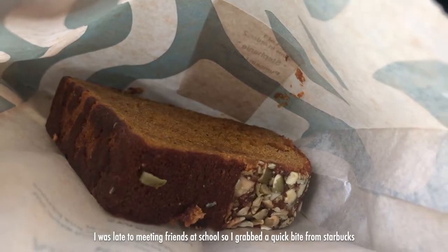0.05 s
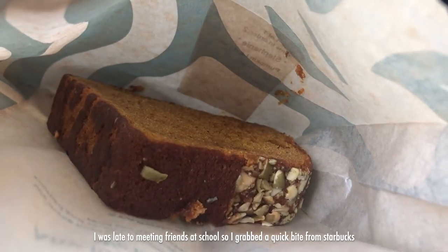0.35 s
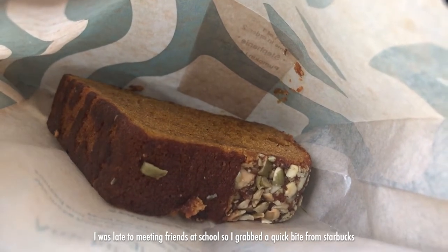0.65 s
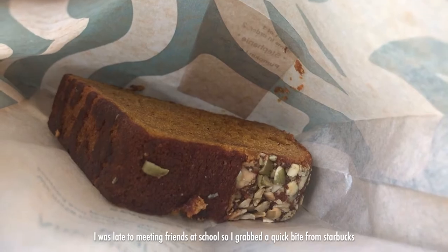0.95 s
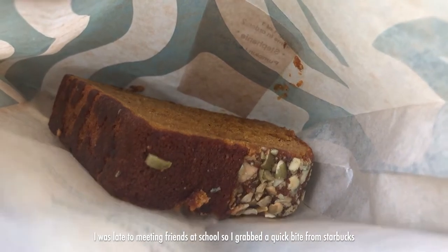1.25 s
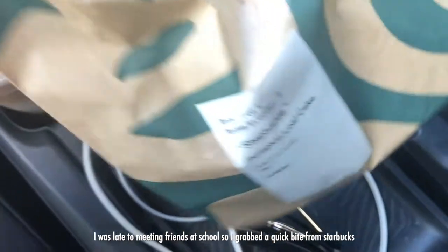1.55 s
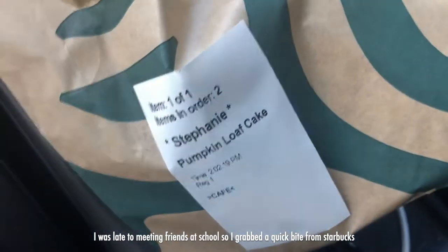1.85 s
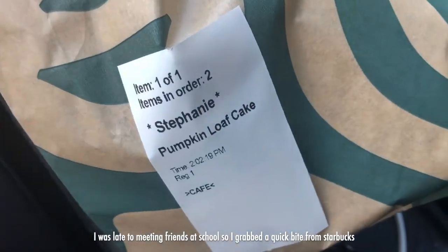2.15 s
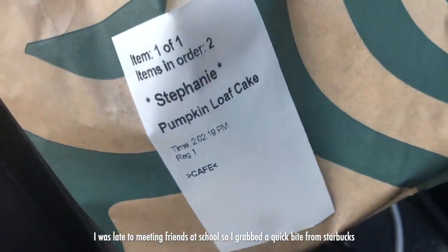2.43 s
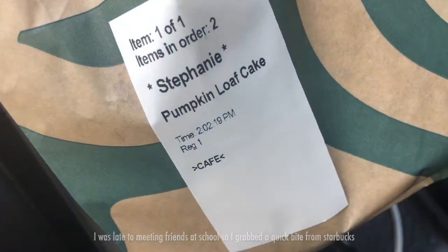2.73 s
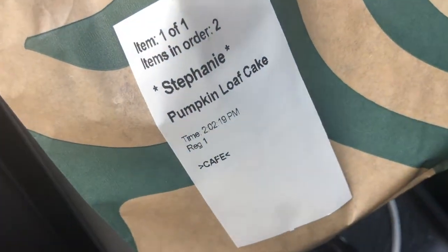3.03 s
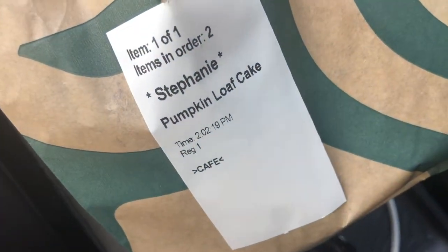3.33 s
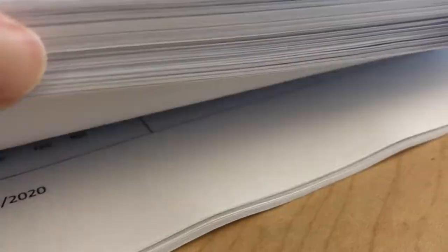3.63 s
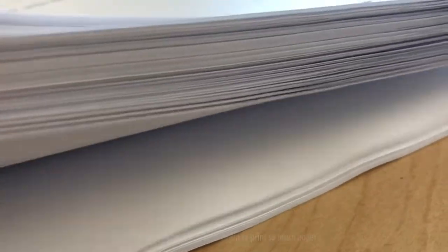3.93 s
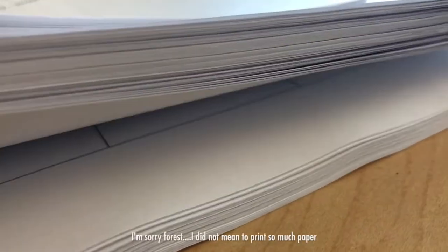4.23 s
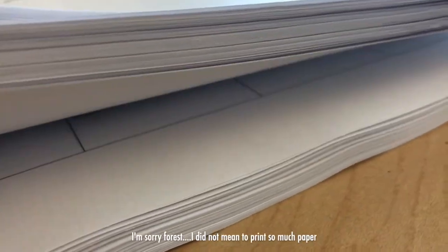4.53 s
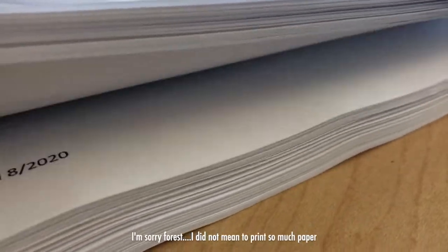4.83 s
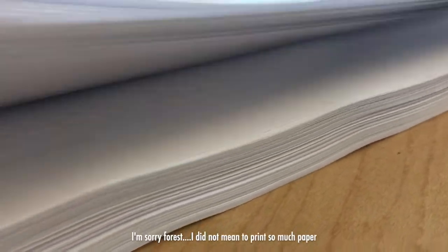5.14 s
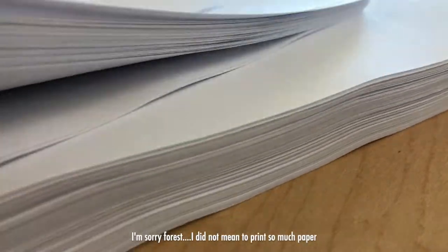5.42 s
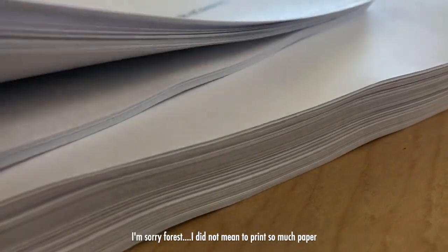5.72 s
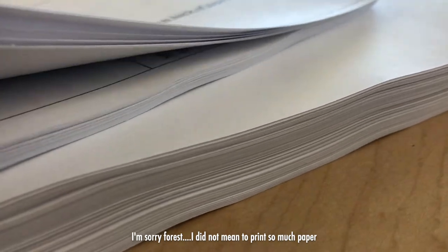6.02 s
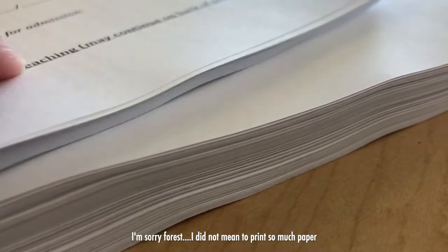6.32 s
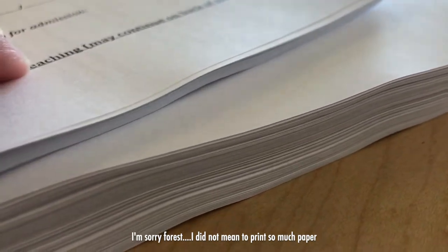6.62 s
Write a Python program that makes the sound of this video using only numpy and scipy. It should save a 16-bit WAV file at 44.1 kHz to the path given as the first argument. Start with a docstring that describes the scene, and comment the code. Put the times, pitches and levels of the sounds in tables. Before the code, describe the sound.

Over the low hum of a parked car, a nearby paper bag rubs and crinkles briefly, then settles with scattered ticks as the rumble eases. The car gives way to the low tone of a quiet room. There, close up, sheets slip off a thumb in an irregular run, scraping, flicking free and patting down on the pile, with soft wafts of air and a faint, intermittent hiss.

```python
"""A paper bag is handled in a parked, idling car: its walls rub and its creases snap.
Around 1.3 s, at the height of the crackle, the microphone lifts off the bag; the rumble drops and
the paper settles. From 3.55 s, in a quiet room, a thumb lets the pages of a thick stack go one by one:
each sheet scrapes past its neighbour and snaps free, and many slap down on the pile,
among soft wafts of air and a faint hiss that comes and goes."""
import sys
import numpy as np
from scipy import signal
from scipy.fft import rfft, irfft
from scipy.io import wavfile

SR = 44100
rng = np.random.default_rng(int(sys.argv[2]) if len(sys.argv) > 2 else 0)


def wrap_up_sound(samples):
    """Save the sound to the file named by the first command line argument, as 16-bit audio."""
    columns = np.atleast_2d(samples).T
    # keep every value between -1 and 1, then stretch to whole-number steps
    tamed = np.clip(columns, -1, 1)
    steps = np.round(tamed * 32767).astype(np.int16)
    wavfile.write(sys.argv[1], SR, steps)


N = 298557
TIME = np.arange(N) / SR
HIT_SIZE, HIT_WINDOW_S = 4096, .005  # samples in one hit; the span over which its level counts
HIT_T, HIT_HZ = np.arange(HIT_SIZE) / SR, np.fft.rfftfreq(HIT_SIZE, 1 / SR)
LIFT_S, ROOM_S = 1.32, 3.55  # the microphone leaves the bag; the room begins
GAP_WIDTH_HZ, EDGE_WIDTH_HZ = 1260, 3000  # widths of the pages' two moving resonances

# Creases buckling. Each row: time in seconds, burst length in seconds, level in dB, brightness in dB.
CREASES = [(0.051, 0.0015, -65.5, 0), (0.6592, 0.0024, -54, -2), (0.9935, .001, -68.5, 4.5),
           (1.149, 0.0011, -49.5, -6.5), (1.164, 0.0034, -35, -1.5), (1.2294, 0.0063, -43.5, -6.5),
           (1.2337, 0.0014, -40, -2.5), (1.238, 0.0016, -41, -4.5), (1.2666, 0.0014, -44.5, -9.5),
           (1.2707, .005, -39, -4), (1.276, 0.00045, -27.5, 8), (1.2973, 0.0022, -39, -2),
           (1.311, .0033, -38, -3), (1.319, .0034, -38, 1), (1.3216, .0014, -37, 7.5),
           (1.325, .0015, -40, 4.5), (1.334, 0.0036, -30.5, 2.5), (1.3489, 0.0045, -38.5, -1.5),
           (1.3699, 0.0006, -40.5, 9), (1.3732, 0.0013, -32, 0), (1.392, 0.0016, -44, 6),
           (1.4048, .0017, -33.5, 0.5), (1.425, 0.00078, -46.5, -4), (1.441, 0.0016, -35, 3),
           (1.4859, 0.001, -55.5, -11), (1.498, 0.0012, -57.5, -7), (1.59, .0047, -59.5, 0.5),
           (1.6357, .0024, -68, -3), (1.7039, 0.0015, -49, 1.5), (1.753, .0013, -65.5, -7),
           (1.847, .00075, -41.5, 11.5), (1.8757, 0.00081, -58.5, -8), (1.9187, 0.0014, -64, -10.5),
           (2.026, 0.0021, -54, -1.5), (2.052, .0019, -64, 3.5), (2.2275, 0.0028, -54.5, -3.5),
           (2.4426, .0011, -68, -1.5), (2.5091, 0.00086, -56.5, 6.5), (2.5898, 0.0017, -66.5, -9),
           (2.6519, 0.001, -64.5, 0.5), (2.672, 0.0011, -78.5, -8.5), (2.9418, 0.00087, -33.5, -1.5),
           (3.2203, .0035, -76.5, -28), (3.2563, .0026, -64.5, -18.5)]
# How taut the bag is held. Each row: time in seconds, pitch of its panels in Hz.
TAUTNESS = [(0, 1600), (1.23, 1604), (1.37, 1950), (1.6, 1640), (2.55, 1840), (2.94, 1360), (3.25, 1200)]
# The bag's walls rubbing. Each row: start in seconds, end in seconds, relative level in dB.
BAG_RUBS = [(.595, .62, -70), (1.06, 1.086, -62.5), (1.1, 1.171, -47.5), (1.187, 1.485, -55.5),
            (1.249, 1.436, -49.5), (1.29, 1.347, -42), (2.15, 2.164, -66), (2.323, 2.34, -66.5),
            (2.83, 2.86, -75), (3.12, 3.151, -76.5)]
# Sheets slipping off the thumb. Each row: release time in seconds, scrape length in seconds,
# then the levels of scrape, snap and flap in dB.
FLICKS = [(3.5976, 0.0018, -61, -38, -28.5), (3.6203, .0016, -58.5, -54.5, -49.5),
          (3.8671, 0.0047, -55.5, -57.5, -43), (3.957, .003, -64.5, -60.5, -62.5),
          (3.968, .004, -73, -49.5, -45), (3.985, 0.0053, -66, -55, -49), (3.9935, 0.0043, -55, -39, -36.5),
          (4.0536, 0.011, -57, -35.5, -35), (4.1473, 0.0086, -52, -43, -35),
          (4.156, 0.0036, -36.5, -30, -31.5), (4.27, .003, -70, -68, -68), (4.408, 0.0093, -44, -33, -33),
          (4.433, .001, -58, -41.5, -38.5), (4.616, 0.01, -57, -46.5, -51), (4.6331, 0.008, -47, -43, -48),
          (4.6847, 0.011, -54.5, -54, -58), (4.706, 0.015, -52.5, -57, -41.5),
          (4.7301, .0087, -58, -52, -46), (4.76, 0.01, -44.5, -44, -34), (4.9203, 0.0096, -45, -56, -45),
          (4.9315, 0.009, -46.5, -40, -31.5), (5.117, 0.0067, -50.5, -69, -49.5),
          (5.1491, 0.017, -47.5, -40.5, -32.5), (5.1686, 0.0097, -49.5, -42, -37),
          (5.254, .0035, -48, -37.5, -40.5), (5.28, 0.0085, -48.5, -42, -49),
          (5.2951, 0.0063, -35.5, -30.5, -31), (5.3463, .0055, -46, -30.5, -37.5),
          (5.3591, .0016, -59, -44, -42), (5.447, 0.0031, -44, -42, -50), (5.458, 0.0036, -42.5, -43, -51),
          (5.4776, 0.005, -38.5, -43.5, -46.5), (5.4978, 0.011, -49.5, -56, -46),
          (5.5093, .004, -62, -41.5, -50), (5.5218, 0.0057, -41, -48, -57),
          (5.6241, 0.012, -43, -36.5, -37.5), (5.7948, 0.017, -50.5, -43.5, -51),
          (5.9348, 0.0088, -43.5, -44, -44.5), (6.1497, 0.016, -44, -38.5, -37),
          (6.2046, 0.014, -54.5, -49.5, -72), (6.227, 0.014, -49, -40, -45),
          (6.2624, 0.015, -41.5, -39, -49), (6.269, 0.011, -45, -60, -43)]
# The wedge of air between open pages. Each row: time in seconds, resonance in Hz, ringing share 0-1.
AIR_GAP = [(3.55, 1680, 0.56), (5.15, 1700, 0.07), (5.6, 2135, 0.95), (5.8, 2070, 0.98), (6.15, 2280, 0.28),
           (6.77, 2600, 0.06)]
# The free edge singing under the thumb. Each row: time in seconds, resonance in Hz, ringing share 0-1.
SINGING_EDGE = [(4.41, 5000, 0.46), (4.6, 9000, 0), (5.15, 7100, 0.1), (5.28, 14100, 0.44),
                (5.45, 14400, 0.25), (5.8, 14500, 0.03), (6.2, 6030, 0.08), (6.27, 8000, 0.36)]
# Sheets landing. Each row: time in seconds, contact in seconds, pitch of trapped air in Hz, level in dB.
SLAPS = [(3.6205, 0.0028, 824, -39), (4.0153, .0015, 520, -44.5), (4.0739, 0.00094, 615, -36),
         (4.1596, 0.0028, 750, -31.5), (4.1704, 0.00014, 1070, -18.5), (4.179, .0031, 926, -49),
         (4.4237, .00033, 820, -19.5), (4.6517, 0.0028, 415, -40.5), (4.7147, 0.0024, 930, -41.5),
         (4.7625, 0.0019, 1050, -45), (4.7746, 0.0033, 450, -40), (4.947, 0.00023, 340, -29),
         (5.167, 0.0028, 1040, -34), (5.185, 0.0011, 435, -41), (5.3061, .0017, 463, -33.5),
         (5.348, .0016, 970, -43), (5.3832, 0.002, 1520, -38.5), (5.3871, 0.0023, 1290, -33),
         (5.5454, 0.0027, 905, -47), (5.643, 0.0024, 786, -34.5), (5.8214, 0.0013, 940, -44.5),
         (5.954, 0.00083, 578, -42.5), (6.1664, 0.0032, 664, -42), (6.2813, 0.0032, 880, -49.5)]
# Resonances of the pile and the desk. Each row: centre in Hz, width in Hz, boost in dB.
STACK_MODES = [(570, 300, 0), (1700, 280, 6.5), (2600, 400, 6)]
# Sheets creeping as the stack bends. Each row: start and end in seconds, relative end level in dB.
SLIDES = [(3.99, 4.112, -60.5), (4.293, 4.405, -56.5), (4.526, 4.622, -51), (4.647, 4.76, -57),
          (4.953, 5.013, -70), (5.17, 5.35, -55.5), (5.434, 5.608, -49.5), (5.737, 5.793, -53.5),
          (6.091, 6.27, -53)]
# Air wafted by moving paper. Each row: time of the peak in seconds, half-width in seconds, level in dB.
PUFFS = [(1.249, 0.0053, -43.5), (1.389, 0.0098, -55), (4.186, .011, -46.5), (4.65, 0.0098, -48),
         (4.773, 0.013, -45), (4.947, 0.0087, -37), (4.987, 0.0047, -42), (5.015, 0.0037, -42.5),
         (5.304, 0.014, -39), (5.348, 0.0071, -39), (5.379, .016, -39), (5.642, 0.012, -44),
         (6.17, .01, -42.5)]
# Stretches of faint hiss. Each row: start in seconds, end in seconds.
HISSES = [(4.14, 4.22), (4.42, 4.815), (4.89, 5.02), (6.19, 6.495), (6.62, 6.8)]
# The idling engine's tones. Each row: pitch in Hz, level at the bag in dB.
ENGINE_HUM = [(177.6, -59), (258.4, -70), (355.3, -67.5), (920.5, -79.5)]
# The EQ curve of a slap. Each row: multiple of its pitch, gain in dB.
SLAP_COLOUR = [(.1, -10), (.3, -10.5), (.65, 3), (1, -3.5), (1.9, -9.5), (3, -20.5), (4.5, -29), (12, -41)]
# EQ curves of the other layers. Each row: frequency in Hz, relative gain in dB.
RUB_COLOUR = [(120, -8.5), (300, 1), (700, 6), (1100, 5.5), (1700, 1.5), (3000, -1.5), (6000, 0),
              (10000, -4), (16000, -6.5)]  # bag wall on bag wall
FACE_COLOUR = [(200, 6), (500, 0.5), (900, 5), (1500, 0), (2600, 5), (3600, -4), (5000, -6.5), (12000, -57)]  # sheet on sheet
SCRAPE_COLOUR = [(1500, -21), (3000, -6), (4200, -6.5), (6200, 5.5), (9000, 2), (11500, -6.5),
                 (13000, -3.5), (15000, 4), (16500, -25.5)]  # a sheet's edge scraping
FLAP_COLOUR = [(80, -4), (200, 5), (450, 4), (800, 1), (1200, 6.5), (2000, 2), (2800, 0), (4500, -23),
               (9000, -80)]  # a freed page flapping
SKIN_COLOUR = [(1500, -26), (3000, -1.5), (4500, -1), (7000, -2.5), (9500, -6), (12000, -9.5), (16000, -15)]  # skin on the cut edges
PUFF_COLOUR = [(50, -13.5), (90, 0), (150, -0.5), (250, 0.5), (340, -11.5), (500, -26.5), (1000, -41.5),
               (3000, -72.5)]  # wafted air
CABIN_NEAR_COLOUR = [(15, -32), (25, -5.5), (55, 3.5), (114, -10), (180, -6.5), (223, -19), (354, -17),
                     (384, -21), (624, -31), (936, -29), (1330, -42), (1890, -46), (4370, -56), (6920, -58),
                     (16000, -66.5)]  # car rumble at the bag
CABIN_FAR_COLOUR = [(25, -20), (45, 2.5), (65, -0.5), (100, -11), (125, -1.5), (155, -5), (190, -12),
                    (220, -17), (260, -11), (400, -18.5), (550, -25.5), (930, -26), (1300, -38.5),
                    (3500, -49), (16000, -62)]  # car rumble away from the bag
ROOM_COLOUR = [(25, -37), (45, -2), (70, 0), (110, -3.5), (150, -0.5), (230, -5.5), (320, -13.5),
               (480, -16), (750, -24.5), (1200, -30.5), (2200, -40), (5000, -45), (16000, -50)]  # room tone


def bag():
    """Creases buckle over the rub of the walls: each gives a bright crack and a knock of its panel."""
    rub_db = wall_rub_db()
    out = amp(rub_db - 4.5) * tint(grains(4600, spread_db=2.5, smooth=.49), RUB_COLOUR) * (TIME < ROOM_S)
    for (s, length, crack_db, bright_db), (facet, offset) in zip(CREASES, rng.random((len(CREASES), 2))):
        # brightness trades the panel's knock for fizz on top of the crack
        panel_db, fizz_db = crack_db - 4 - bright_db, crack_db - 4.5 + bright_db
        crack = colour([(800, crack_db - 32.5), (2000, crack_db - 7.5), (3200, crack_db - 3.5),
                        (5500, crack_db), (9000, fizz_db + 2), (12000, fizz_db - 2.5),
                        (15500, fizz_db - 5)], HIT_HZ)
        # each facet of the paper has its own row of broad resonances
        crack *= amp(2.5 * np.sin(2 * np.pi * (np.log2(HIT_HZ + 1) * (1 + facet) + offset)))
        gain = np.hypot(amp(crack_db), amp(fizz_db)) * amp(.77)
        add(out, s - .0003, gain * strike(burst(length, .42 + 800 * length), crack, bend_s=.001102))
        flex = np.clip((rub_db[round(s * SR)] + 73) / 22, 0, 1)  # a moving wall bends as a whole
        bass_db, bend_s = -13 + 12 * flex, .0008 + .00202 * flex
        panel_hz = np.interp(s, *np.transpose(TAUTNESS))
        panel = colour([(.06, bass_db - 9.5), (.15, bass_db - 2.5), (.32, bass_db), (.6, -2.5),
                        (1, -3), (1.5, -2), (2.5, -24), (6, -41.5)], HIT_HZ / panel_hz)
        add(out, s - .52 * bend_s, amp(panel_db) * strike(burst(length, 800 * length), panel, bend_s))
    return reflections(out, t60=.044, wet_db=-11, dull_hz=9000)


def wall_rub_db():
    """Envelope of the bag's walls in dB: single rubs over a faint stir that dies away after the lift."""
    resting = amp(-77.5) * (TIME <= LIFT_S)
    settling = amp(-73.5 - 7.5 * (TIME - LIFT_S)) * (TIME > LIFT_S)
    rub_power = sum((amp(db) * stroke(start, end, attack_s=.005, release_s=.02)) ** 2
                    for start, end, db in BAG_RUBS)
    return 10 * np.log10(rub_power + settling ** 2 + resting ** 2)


def flicks():
    """A sheet scrapes harder and harder until its edge springs free and the page flaps."""
    out, face_power, edge_power = np.zeros((3, N))
    flap = colour(FLAP_COLOUR, HIT_HZ)
    for s, length, scrape_db, snap_db, flap_db in FLICKS:
        heavy_db = flap_db - snap_db  # several sheets going at once flap more and sound duller
        edge_db, treble_db = scrape_db - .13 * heavy_db, snap_db - 5 - .28 * heavy_db
        left_s = np.arange(round(3 * length * SR), -300, -1) / SR  # countdown to the release
        swell = np.exp(-.9 * (np.maximum(left_s, 0) / length) ** 2.07 + np.minimum(left_s, 0) / .0012)
        add(face_power, s - left_s[0], swell * amp(scrape_db + .7) ** 2)
        # the edge swells more steeply, so the scrape brightens toward the release
        add(edge_power, s - left_s[0], swell ** 1.46 * amp(edge_db + .5) ** 2)
        snap = colour([(700, snap_db - 38), (2000, snap_db - 7), (3000, snap_db - 1),
                       (4300, snap_db - 6), (6000, snap_db - 6), (9000, treble_db - 4),
                       (12000, treble_db - 9), (15000, treble_db - 14)], HIT_HZ)
        gain = np.hypot(amp(snap_db), amp(treble_db)) * amp(-2)
        letting_go = burst(.0012, scatter=.33 + 60 * length)  # a longer scrape lets go more gradually
        add(out, s - .0008, gain * strike(letting_go, snap, bend_s=.00161))
        add(out, s - .0015, amp(flap_db - 2.5) * strike(burst(.0023, scatter=.73), flap, bend_s=.0032))
    face = ringing(grains(8000, spread_db=.7, smooth=.62), AIR_GAP, GAP_WIDTH_HZ, FACE_COLOUR)
    edge = ringing(grains(8000, spread_db=-3.2, smooth=.65), SINGING_EDGE, EDGE_WIDTH_HZ, SCRAPE_COLOUR)
    return out + np.sqrt(face_power) * face + np.sqrt(edge_power) * edge


def slaps():
    """A falling sheet squeezes out the air under it: a short, falling pop and a tick from its edge."""
    out = np.zeros(N)
    tick = colour([(1000, -14), (3500, 8.5), (5500, -1.5), (9000, -3), (16000, -13.5)], HIT_HZ)
    stack = amp(sum(db / (1 + (2 * (HIT_HZ - hz) / width) ** 2) for hz, width, db in STACK_MODES))
    high_cut = 1 / np.hypot(1, (HIT_HZ / 2900) ** 5)
    for s, length, hz, slap_db in SLAPS:
        pop = stack * colour(SLAP_COLOUR, HIT_HZ / hz) * high_cut
        add(out, s - .0016, amp(slap_db - 1.05) * strike(touchdown(length), pop, bend_s=.0025))
        add(out, s - .0003, amp(slap_db - 24) * strike(burst(length, scatter=1.64), tick, bend_s=.000765))
    return out


def thumb():
    """Soft friction of sheet on sheet and skin on cut edges, swelling as the thumb bends the stack."""
    slide = np.zeros(N)
    for start, end, db in SLIDES:
        slack = np.clip((end - TIME) / (end - start), 0, 1)
        slide += amp(db - 6 * slack) * stroke(start, end, attack_s=.012, release_s=.016)
    faces = amp(-6.5 + .75 * drift(25))
    faces *= ringing(rng.standard_normal(N), AIR_GAP, GAP_WIDTH_HZ, FACE_COLOUR)
    skin = amp(-13.5 + drift(25)) * noise(SKIN_COLOUR)
    return slide * (faces + skin)


def puffs():
    """Soft low wafts of air pushed by moving paper."""
    power = sum(amp(db) ** 2 * np.exp(-((TIME - s) / width) ** 2) for s, width, db in PUFFS)
    return np.sqrt(power) * noise(PUFF_COLOUR)


def hiss():
    """A faint, even hiss that comes and goes around the pages."""
    gate = sum(stroke(start, end, attack_s=.006, release_s=.006) for start, end in HISSES)
    return gate * (amp(-71.5) * noise(SKIN_COLOUR) + amp(-73) * noise(FACE_COLOUR))


def idling_car():
    """Engine hum and cabin rumble: both drop as the microphone lifts, and a low boom comes in."""
    near = np.clip((LIFT_S - TIME) / .25 + .5, 0, 1)
    hum = sum(tone(hz, db) for hz, db in ENGINE_HUM)
    at_bag = amp(-45.16) * noise(CABIN_NEAR_COLOUR) + hum
    away = amp(-56.5) * noise(CABIN_FAR_COLOUR) + amp(-8) * hum + tone(hz=124.2, db=-63)
    return near * at_bag + np.sqrt(1 - near ** 2) * away


def room_tone():
    """The air of the quiet room: a low bed that barely wavers."""
    return amp(-51 + .28 * drift(12)) * noise(ROOM_COLOUR)


def burst(length, scatter):
    """One sharp jolt and a scatter of smaller ones that decays over length seconds."""
    rest = rng.standard_normal(HIT_SIZE) * np.exp(-HIT_T / max(length, 1e-4))
    return (HIT_T == 0) + scatter * rest / np.linalg.norm(rest)


def touchdown(length):
    """A sheet landing bit by bit: a jolt, then contacts that build up and die away."""
    progress = HIT_T / max(length, 1e-4)
    contacts = rng.standard_normal(HIT_SIZE) * progress * np.exp(-1.7 * progress)
    return (HIT_T == 0) + 750 * length * contacts / np.linalg.norm(contacts)


def strike(push, gain, bend_s):
    """A push radiated by paper. Bending waves are slower in the bass: 1 kHz comes about bend_s late."""
    log_gain = np.log(np.maximum(gain / gain.max(), 1e-5))
    minimum_phase = -signal.hilbert(np.r_[log_gain, log_gain[-2:0:-1]]).imag[:len(gain)]
    bending_phase = -4 * np.pi * bend_s * 1000 * np.sqrt((HIT_HZ + 100) / 1000)
    sound = irfft(rfft(push) * np.exp(log_gain + 1j * (minimum_phase + bending_phase)))
    return sound / np.linalg.norm(sound) * np.sqrt(HIT_WINDOW_S * SR)


def grains(per_s, spread_db, smooth):
    """Fibres catching: clicks of uneven size over a smooth hiss."""
    size = amp(spread_db * np.minimum(rng.exponential(1, N), 4))
    clicks = rng.standard_normal(N) * size * (rng.random(N) < per_s / SR)
    return unit(unit(clicks) + smooth * rng.standard_normal(N))


def ringing(x, track, width_hz, curve):
    """Rubbing noise: a share of it rings in one moving resonance, the rest keeps a broad colour."""
    s, hz, share = np.transpose(track)
    carrier = np.exp(2j * np.pi * np.cumsum(np.interp(TIME, s, hz)) / SR)
    ring = (carrier * signal.lfilter(*signal.butter(2, width_hz / 2, fs=SR), x / carrier)).real
    share = np.clip(np.interp(TIME, s, share), 0, 1)
    return unit(share * unit(ring) + (1 - share) * tint(x, curve))


def reflections(x, t60, wet_db, dull_hz):
    """Adds dense early echoes from surfaces close by, duller than the direct sound."""
    t = np.arange(2 * HIT_SIZE) / SR
    tail = rng.standard_normal(len(t)) * np.exp(-np.log(1000) * t / t60) * np.minimum(t / .00073, 1)
    pole = np.exp(-2 * np.pi * dull_hz / SR)
    tail = signal.lfilter([1 - pole], [1, -pole], tail / np.linalg.norm(tail))
    return x + amp(wet_db) * signal.oaconvolve(x, tail)[:N]


def stroke(start, end, attack_s, release_s):
    """Envelope of one stroke: it rises up to start, holds, and dies away after end."""
    return np.exp(np.minimum(TIME - start, 0) / attack_s - np.maximum(TIME - end, 0) / release_s)


def tone(hz, db):
    """A slightly wavering hum."""
    pitch = hz * (1 + .006 * drift(5.85))
    return amp(db) * np.sqrt(2) * np.cos(2 * np.pi * np.cumsum(pitch) / SR)


def drift(rate_hz):
    """Slow random wander of rms 1."""
    low_pass = np.exp(-(np.fft.rfftfreq(N, 1 / SR) / rate_hz) ** 2)
    return unit(irfft(rfft(rng.standard_normal(N)) * low_pass, N))


def noise(curve):
    """Steady noise through an EQ curve, at rms 1."""
    return tint(rng.standard_normal(N), curve)


def tint(x, curve):
    """Puts a long sound through an EQ curve, at rms 1."""
    return unit(irfft(rfft(x) * colour(curve, np.fft.rfftfreq(len(x), 1 / SR)), len(x)))


def colour(curve, hz):
    """Gain of an EQ curve on a log-frequency axis."""
    points, db = np.transpose(curve)
    return amp(np.interp(np.log(hz + 1e-6), np.log(points), db))


def add(mix, s, sound):
    """Mixes a sound in at s seconds."""
    part = mix[max(round(s * SR), 0):][:len(sound)]
    part += sound[:len(part)]


def amp(db):
    """Decibels to gain."""
    return 10 ** (np.asarray(db) / 20)


def unit(x):
    """Scales to rms 1."""
    return x / np.sqrt(np.mean(x ** 2) + 1e-20)


def scene():
    """The bag in the car, then the pages over the desk, in mono."""
    pages = reflections(flicks() + slaps(), t60=.041, wet_db=-11, dull_hz=2000)
    pages = reflections(pages, t60=.3, wet_db=-30.5, dull_hz=5000)
    foreground = bag() + pages + puffs() + thumb()
    indoors = np.clip((TIME - ROOM_S) / .011 + .5, 0, 1)  # an 11 ms crossfade from car to room
    return (foreground + hiss() + (1 - indoors) * idling_car() + indoors * room_tone())[None]


def record(dry):
    """Master EQ: a low cut at 39 Hz and a steep high cut at 16.3 kHz."""
    low_cut = signal.butter(6, 39, "highpass", fs=SR, output="sos")
    high_cut = signal.firwin(255, 16300, window=("kaiser", 9), fs=SR)
    return signal.oaconvolve(signal.sosfilt(low_cut, dry), high_cut[None], "same")


dry = scene()
out = record(dry)
wrap_up_sound(out)
```